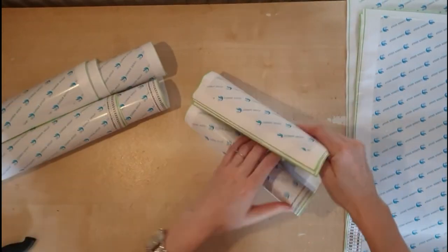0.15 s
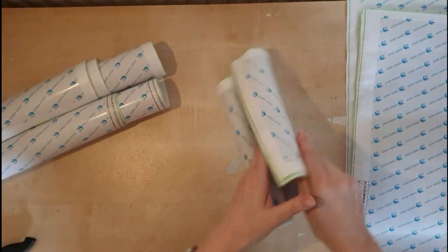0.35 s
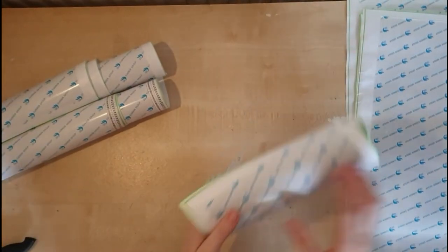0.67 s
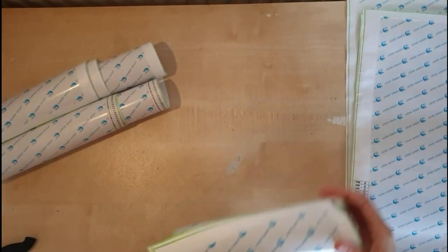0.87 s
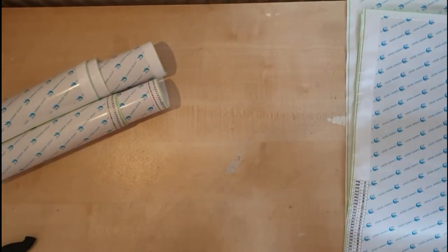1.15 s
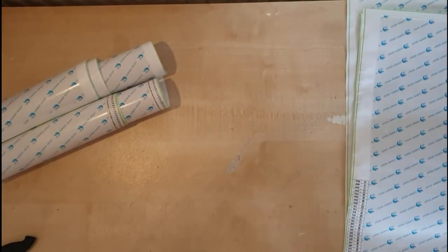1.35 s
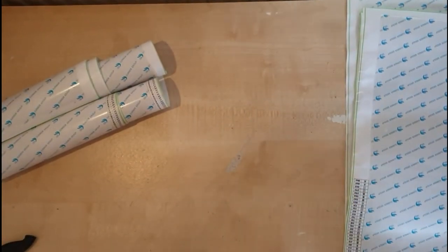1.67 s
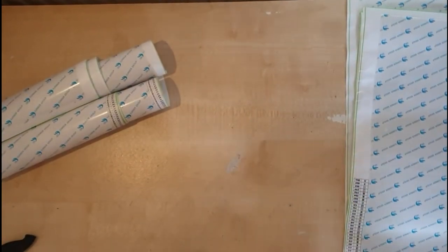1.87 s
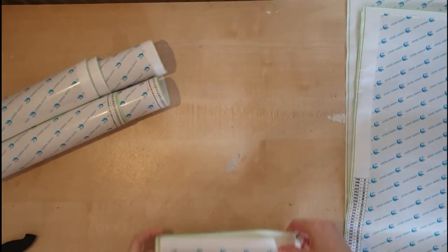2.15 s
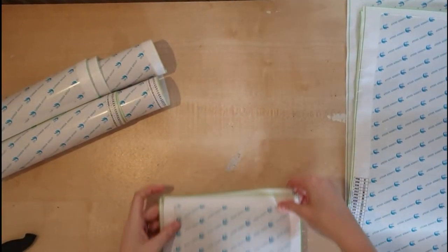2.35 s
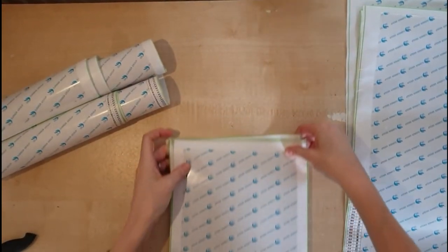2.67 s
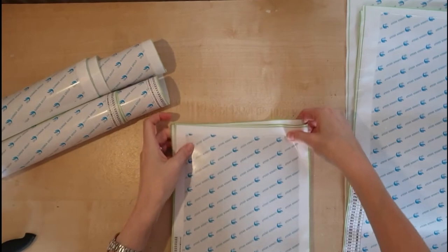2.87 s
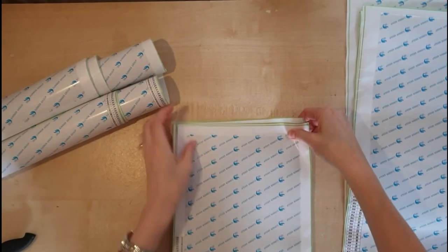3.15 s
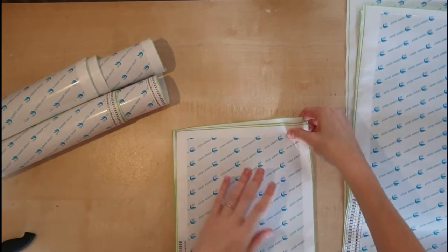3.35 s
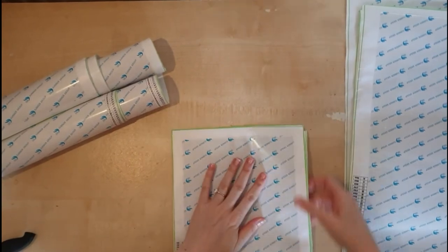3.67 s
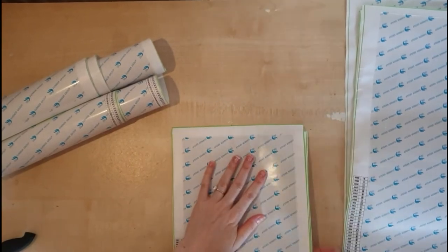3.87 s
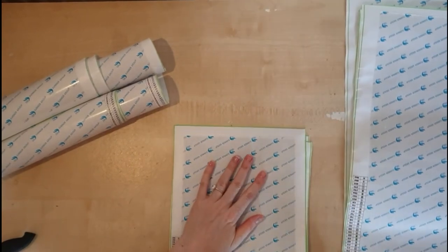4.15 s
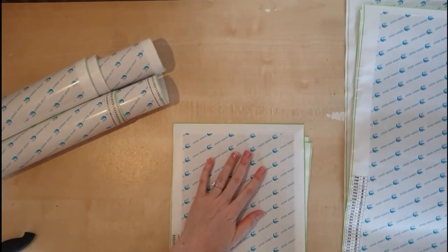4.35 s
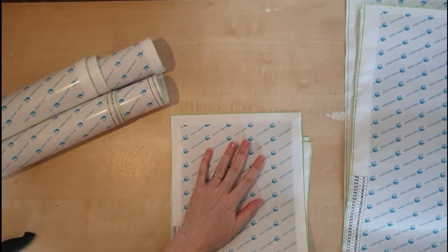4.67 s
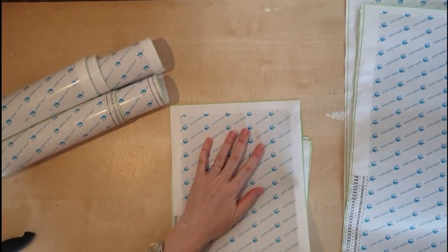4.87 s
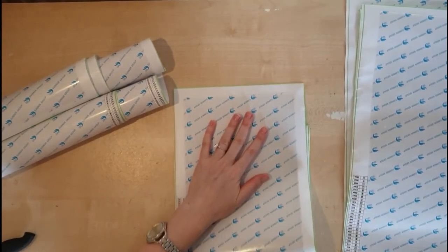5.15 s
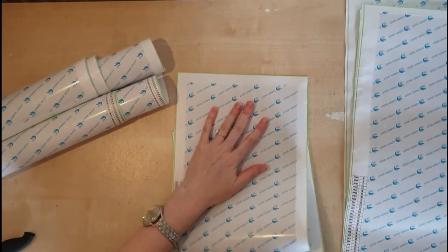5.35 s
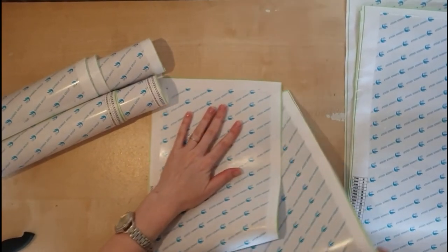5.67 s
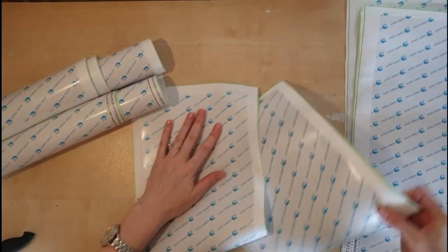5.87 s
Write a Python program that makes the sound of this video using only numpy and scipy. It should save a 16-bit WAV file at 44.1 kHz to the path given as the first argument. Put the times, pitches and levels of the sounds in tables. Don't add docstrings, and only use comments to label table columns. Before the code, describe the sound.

A quiet small room, heard closely in stereo, with faint low traffic rumble and a thin fan whine. From 0 to 1 s, stiff film-covered canvas rustles and rasps in short strokes, with a pop at 0.3 and a cluster of bright ticks near 0.4. Softer hiss and faint brushing continue to 1.8, rising again around 2. At 2.2 the sheets meet the wooden table and drag with hollow, resonant scraping; stuttering groans and pops run to 2.6, then a skid drops in pitch and stops near 2.9. Gentle smoothing, light taps and small pops follow from 3.1 to 4.1. At 4.21 a hard, dry snap strikes, with tiny bounces and a short woody ring. A brief chirp comes at 4.65 and a small double crack at 4.82. From about 5.3 the rustling swells, loudest at 5.55 with creases ticking, and sliding continues to 6 s.

```python
import sys
import numpy as np
from scipy import signal
from scipy.fft import rfft, irfft, next_fast_len
from scipy.io import wavfile

SR = 44100
rng = np.random.default_rng(int(sys.argv[2]) if len(sys.argv) > 2 else 0)


def wav_record(signal):
    frames = np.transpose(np.atleast_2d(signal))
    bounded = np.clip(frames, -1, 1)
    quanta = np.round(bounded * 32767).astype(np.int16)
    wavfile.write(sys.argv[1], SR, quanta)


def boost(x):
    u = np.asarray(x, float) / 20
    return 10 ** u


N = 265041
SIZE = next_fast_len(N + SR // 2)
FREQ = np.maximum(np.arange(SIZE // 2 + 1) * SR / SIZE, 1)


def rms_one(x):
    return x / np.sqrt(np.mean(x ** 2) + 1e-20)


def in_time(rows):
    s, *columns = np.transpose(rows)
    return [np.interp(np.arange(N) / SR, s, column) for column in columns]


def at_hz(points, hz):
    point_hz, values = np.array(points)[:, 0], np.array(points)[:, 1]
    return np.interp(np.log(hz), np.log(point_hz), values)


def drift(rate):
    r = np.exp(-80 * np.pi * rate / SR)
    noise = rng.standard_normal(N // 40 + 2002)
    slow = signal.lfilter([1], [1, -2 * r, r * r], noise)[2000:]
    return np.interp(np.arange(N) / 40, np.arange(len(slow)), rms_one(slow))


def ring(clicks, hz, t60):
    r, w = boost(-60 / (t60 * SR)), 2 * np.pi * hz / SR
    return signal.lfilter([0, np.sin(w)], [1, -2 * r * np.cos(w), r * r], clicks + 1e-18)


def friction(per_s, spread_db, grain_share):
    born = rng.random((2, N)) < per_s * boost(3.0 * drift(15)) / SR
    sizes_db = spread_db * np.minimum(rng.exponential(1, (2, N)), 5)
    catches = born * boost(sizes_db) * rng.choice([-1, 1], (2, N))
    share = np.clip(grain_share, 0, 1)
    return np.sqrt(share) * rms_one(catches) + np.sqrt(1 - share) * rng.standard_normal((2, N))


# (pitch [Hz], likeness [0 to 1])
LIKENESS = [(60, 0.95), (150, 0.89), (380, 0.95), (600, .8), (950, 0.6), (2380, 0.39), (5980, 0.18),
            (15000, 0.12)]
# (pitch [Hz], left minus right [dB])
SIDES = [(60, 0), (180, 1), (550, 0.5), (1650, 2.5), (4970, 1), (15000, -1.5)]


def to_ears(mid, side, alike):
    return np.sqrt(1 + alike) * mid + np.sqrt(1 - alike) * side * [[1], [-1]]


def coloured(pair, shape, patchy_db, count, lead_s=0):
    mid, side = rfft(pair, SIZE) * shape
    alike = np.clip(at_hz(LIKENESS, FREQ), 0, 1)
    lean = boost(at_hz(SIDES, FREQ) / 2)
    right_delay = np.exp(-2j * np.pi * FREQ * lead_s)
    ears = to_ears(mid, side, alike) * [lean, right_delay / lean]
    share = np.cumsum(shape ** 2 / FREQ)
    place = share / share[-1] * (count - 1)
    total = 0
    for k in range(count):
        band = irfft(ears * np.clip(1 - abs(place - k), 0, 1), SIZE)[:, :N]
        total = total + band * boost(patchy_db * (drift(20.3) + drift(3.3)))
    return rms_one(total)


def flanks_db(t, peak, rise, fall):
    before, after = (peak - t) / np.maximum(rise, 1e-3), (t - peak) / np.maximum(fall, 1e-3)
    far = np.where(t < peak, before, after)
    return -10 * (far ** 1.57 + 0.02 * far ** 4)


COARSE_SWING = 1.176


def gestures(rows):
    t = np.arange(0, N + 32, 32) / SR
    peak, rise, fall, db, coarse_db = np.transpose(rows)[:, :, None]
    flanks = flanks_db(t, peak, rise, fall)
    fine = boost(2 * (db + flanks))
    coarse = boost(2 * (db + coarse_db + COARSE_SWING * flanks))
    levels = [10 * np.log10(power.sum(axis=0) + 1e-12) for power in (fine, coarse)]
    return [np.interp(np.arange(N) / SR, t, level) for level in levels]


# (time [s], level [dB])
RUMBLE = [(0, -56.5), (.84, -62), (2.2, -54.5), (3.5, -56), (4.5, -60), (5.1, -59), (5.25, -47),
          (5.38, -57.5), (6.01, -59)]
# (pitch [Hz], level [dB per Hz])
HUM = [(13, -34.5), (22, -32), (43, 9), (65, -7), (97, 0.5), (110, -15.5), (118, -16), (144, -12.5),
       (163, -48), (300, -27), (390, -62), (660, -120)]
# (pitch [Hz], level [dB per Hz])
AIR = [(150, -3), (300, -12), (500, -12), (1100, -19), (1500, -17), (1800, -8.5), (1950, -4.5),
       (2120, -5.5), (2600, -24.5), (4000, -36), (6900, -35), (8800, -39), (15500, -40)]
AIR_DB = -71


def background():
    rumble = coloured(rng.standard_normal((2, N)), boost(at_hz(HUM, FREQ)), patchy_db=0.3, count=3)
    air_shape = boost(at_hz(AIR, FREQ)) / (1 + (120 / FREQ) ** 4)
    air = coloured(rng.standard_normal((2, N)), air_shape, patchy_db=0.5, count=1)
    return boost(in_time(RUMBLE)[0]) * rumble + boost(AIR_DB) * air


# (time [s], board level [dB], weave level [dB])
JOLTS = [
    (4.215, -32, -36),
    (4.818, -45.5, -43),
]
JOLT_RISE_S, JOLT_FILM_DB = 0.0017, -25.5
SHEET_FALL_S = 0.0071
# (peak time [s], rise [s], fall
# [s], film hiss level [dB], weave above film [dB])
SHEET_RUBS = [(0, .02, .04, -57, 2), (.088, 0.081, 0.049, -59.5, 9), (.18, 0.046, 0.19, -58.5, 2.5),
              (.308, 0.037, 0.2, -54, 4), (.415, 0.017, 0.05, -54, 13.5), (.58, .12, 0.063, -61, 1.5),
              (.66, 0.03, 0.02, -64, -10), (.748, 0.017, 0.018, -52, -12), (.82, 0.17, 0.07, -63, -11),
              (.903, 0.0057, 0.043, -57.5, -7), (.95, 0.022, 0.093, -52.5, -2), (1.17, .1, 0.13, -72, -20),
              (1.255, 0.01, 0.17, -61, -19), (1.45, .03, .025, -64, 4), (1.39, 0.059, 0.05, -55.5, 0.5),
              (1.585, .008, 0.088, -72.5, 2), (1.68, 0.046, 0.087, -63, -2), (1.79, 0.13, 0.14, -53, -0.5),
              (2.08, 0.15, 0.1, -53.5, -6.5),
              (2.18, 0.018, 0.71, -59, 7), (2.557, 0.23, 0.21, -54.5, 7.5), (2.72, 0.064, 0.087, -55, 14),
               (2.823, 0.042, .13, -58, 13), (3.04, .08, .06, -71.5, 0), (3.135, 0.019, 0.078, -54, -7),
               (3.219, 0.097, 0.072, -67, 11.5), (3.431, 0.0091, .1, -60, 0.5),
               (3.52, 0.066, 0.082, -60.5, 7), (3.62, 0.076, 0.51, -56.5, -2.5),
               (3.98, 0.047, 0.041, -65, 14), (4.1, 0.12, 0.3, -63.5, 8.5),
               (4.225, 0.0045, 0.067, -72.5, 24), (4.38, 0.11, 0.075, -64, 4.5), (4.6, 0.082, 0.85, -69, 7),
               (4.663, 0.018, 0.06, -59, 12.5), (4.815, .03, .06, -63.5, 9.5), (5.2, 0.58, 1, -60.5, 7),
               (5.55, 0.19, 0.088, -45.5, 0.5), (5.62, 0.066, 0.35, -49.5, 8.5),
               (5.85, 0.13, 0.092, -49, -3), (6.01, 0.052, 0.046, -52.5, 8)]
# (pitch [Hz], level [dB per Hz])
FILM = [(1470, -47), (2500, -8), (3100, -7), (3370, -3), (3780, -2.5), (4830, 4.5), (6930, 6), (8920, 1.5),
        (12000, 5.5), (15600, 3.5)]
# (pitch [Hz], level [dB per Hz])
WEAVE = [(700, -11.5), (1200, -5), (1900, 1.5), (2600, -1), (3200, -1.5), (4200, -2.5), (6000, -7),
         (9000, -14.5)]
FILM_LEAD_S = 4.5e-5


def sheets():
    jolts = [(s, JOLT_RISE_S, SHEET_FALL_S, db + JOLT_FILM_DB, -JOLT_FILM_DB) for s, _, db in JOLTS]
    film_db, weave_db = gestures(SHEET_RUBS + jolts)
    mode_hz = np.exp(rng.uniform(np.log(1200), np.log(8000), 40))
    modes = sum(1 / (1 + ((FREQ / hz - 1) / 0.009) ** 2) for hz in mode_hz)
    film_shape = boost(at_hz(FILM, FREQ))
    weave_shape = boost(at_hz(WEAVE, FREQ)) * np.sqrt(0.4 + modes)
    film = coloured(friction(9000, 3.7, 0.31), film_shape, patchy_db=1.0, count=4, lead_s=FILM_LEAD_S)
    weave = coloured(friction(3000, 3.5, 0.4), weave_shape, patchy_db=1.3, count=6, lead_s=FILM_LEAD_S)
    return boost(film_db + 4.5) * film + boost(weave_db - 0.18) * weave


# (peak time [s], rise [s], fall [s], board level [dB],
# thud above board [dB])
TABLE_RUBS = [(0, 0.022, .12, -51.5, -4), (.308, .004, 0.055, -58, -4), (.42, 0.08, 0.07, -56, -28),
              (.79, 0.24, 0.049, -64, -5), (.95, .03, 0.16, -72, -7), (1.215, 0.021, 0.072, -74, 12),
              (1.42, 0.092, 0.04, -55.5, -21), (1.72, 0.039, 0.09, -60.5, -29),
              (2.162, .003, .03, -49.5, 0.5), (2.189, 0.019, 0.083, -42, 0), (2.43, .15, 0.1, -39.5, -0.5),
         (2.58, 0.15, 0.17, -40, -2), (2.79, 0.37, 0.08, -36, -11), (2.88, 0.061, 0.1, -47, 5),
         (3.201, 0.081, 0.085, -59.5, -4), (3.435, 0.009, 0.17, -49.5, 3.5),
         (3.57, 0.12, 0.011, -54.5, 12.5), (3.88, 0.22, 0.046, -57.5, -10), (3.968, 0.023, 0.059, -46, 1.5),
         (4.128, 0.2, 0.064, -51, -6), (4.668, 0.019, 0.03, -44, -28), (4.72, 0.13, .1, -59.5, -14),
         (4.9, 0.1, 0.07, -59.5, -4), (5.3, 0.24, 0.32, -53.5, -16), (5.657, 0.17, 0.13, -38.5, -11.5),
         (5.835, 0.15, 0.094, -44.5, -2.5), (6.01, 0.069, .04, -42, -21)]
# (pitch [Hz], width [Hz], level [dB])
BOARD = [(535, 17.4, -1.5), (731, 42, -1), (839, 30, -7.5), (889, 30, -4), (1040, 87, -5.5),
         (1168, 12.4, -6.5), (1504, 67, -10.5)]
# (pitch [Hz], level [dB per Hz])
THUD = [(60, -26), (120, -15.5), (190, 1.5), (260, -10), (330, -1), (430, -4), (600, -52.5)]
BOARD_FALL_S, JOLT_THUD_DB = 0.044, -14


def table():
    jolts = [(s, JOLT_RISE_S, BOARD_FALL_S, db, JOLT_THUD_DB) for s, db, _ in JOLTS]
    board_db, thud_db = gestures(TABLE_RUBS + jolts)
    powers = [boost(2 * db) / (1 + (2 * (FREQ - hz) / width) ** 2) for hz, width, db in BOARD]
    modes = np.sqrt(sum(powers)) ** 0.76
    board_shape = modes / (1 + (520 / FREQ) ** 4) / (1 + (FREQ / 2200) ** 2)
    board = coloured(friction(2000, 3.0, 0.3), board_shape, patchy_db=2.0, count=6)
    thud = coloured(friction(400, 3.2, 0.97), boost(at_hz(THUD, FREQ)), patchy_db=2.8, count=4)
    return boost(board_db - 4.5) * board + boost(thud_db - 8.0) * thud


# (peak time [s], rise [s], fall [s], pitch [Hz], level
# [dB])
HOLLOWS = [(.007, 0.011, 0.13, 480, -56), (.35, 0.05, 0.17, 1055, -59.5), (.41, .02, .07, 2100, -71),
           (.97, 0.047, 0.072, 1070, -61), (.905, 0.0052, 0.1, 727, -62.5),
           (1.22, 0.017, 0.036, 467, -69.5), (1.34, 0.081, 0.11, 730, -70), (2.08, .08, 0.037, 1740, -64),
           (2.04, .05, 0.044, 3700, -67), (2.11, .05, .04, 4300, -64), (2.19, .012, 0.044, 180, -51),
           (2.165, .004, .05, 345, -53), (3.89, .015, .02, 1000, -60), (3.525, .02, .025, 950, -56),
           (2.95, .02, .03, 190, -55), (2.39, .03, .03, 755, -48), (2.59, 0.1, 0.11, 1220, -45),
           (2.6, 0.25, 0.21, 534, -50.5), (2.55, 0.13, 0.33, 716, -45.5), (2.41, 0.018, 0.033, 145, -42),
           (2.845, 0.055, 0.056, 424, -44.5), (2.9, 0.034, 0.034, 353, -51.5), (4.222, .006, .05, 140, -49),
           (2.335, 0.022, .03, 875, -47), (2.9, 0.086, 0.057, 195, -47), (3.5, 0.1, 0.062, 105, -54),
           (3.6, .14, 0.014, 189, -56.5), (3.73, 0.11, 0.46, 1250, -65), (4.24, 0.012, 0.04, 845, -42),
           (4.6, 0.093, 0.08, 1700, -62), (4.7, 0.04, 0.09, 1690, -59), (4.846, 0.035, 0.069, 130, -54),
           (5.246, 0.072, 0.039, 210, -63.5), (5.5, 0.27, 0.29, 837, -56), (5.718, 0.12, 0.015, 434, -51.5),
           (6.002, 0.0055, .1, 538, -39.5)]
# (peak time [s], rise [s], fall [s], pitch [Hz], level [dB])
CRUMPLES = [(0.021, 0.069, 0.088, 4940, -48.5), (.423, 0.03, 0.013, 5800, -51),
            (4.823, 0.0066, 0.021, 5100, -46), (1.14, .08, .09, 7000, -73), (.744, .007, .011, 8100, -51.5),
            (.744, .007, .012, 10900, -55)]
HOLLOW_WIDTH_HZ, CRUMPLE_WIDTH_HZ = 87, 1000


def hollows():
    out = np.zeros((2, N + SR))
    for rows, width_hz in (HOLLOWS, HOLLOW_WIDTH_HZ), (CRUMPLES, CRUMPLE_WIDTH_HZ):
        for peak, rise, fall, hz, db in rows:
            i = round(max(peak - 0.5, 0) * SR)
            t = (i + np.arange(SR)) / SR
            t60 = np.log(1000) / np.pi / (1.5 * width_hz * np.sqrt(hz / 1000))
            mid, side = ring(ring(rng.standard_normal((2, SR)), hz, t60), hz, t60)
            alike = np.clip(at_hz(LIKENESS, hz), 0, 1)
            ears = rms_one(to_ears(mid, side, alike))
            lean_db = at_hz(SIDES, hz) / 2 * np.array([[1], [-1]])
            out[:, i:i + SR] += ears * boost(db + flanks_db(t, peak, rise, fall) + lean_db)
    return out[:, :N]


# (time [s], peak level [dB], pitch [Hz], pan to left [dB])
POPS = [(0.306, -38, 1050, 4), (0.897, -58, 726, 0.5), (0.939, -47, 1060, -5), (1.203, -57.5, 433, 2.0),
        (2.158, -45.5, 553, 0.5), (2.177, -39.5, 736, 0.5), (3.19, -44, 1060, 1.5), (3.429, -49, 720, 4),
        (3.57, -44.5, 468, -1), (3.956, -57, 810, -2), (4.119, -42, 780, -0.5), (2.293, -35, 708, 5),
        (2.381, -33, 748, 2.5), (2.434, -32, 720, 2.5), (2.501, -33, 724, 3)]
# (time [s], peak level [dB], pitch [Hz], pan to left [dB])
TICKS = [(0.397, -46, 3000, 3.0), (0.4043, -34, 3600, 4), (0.4095, -35, 3700, 4), (0.412, -35, 2150, 2),
         (.4176, -46, 3300, 3), (.4235, -41, 2500, 1), (0.4255, -29, 3770, 3), (.4262, -32.5, 2100, 5),
         (.455, -42, 3000, 3), (2.823, -30.5, 1820, 6), (4.821, -38.5, 3640, -1), (4.8255, -39, 4000, 1),
         (4.8285, -42, 2400, 0), (5.532, -35, 1610, 4), (5.578, -39, 3330, 2), (5.606, -32, 1940, 1.0),
         (5.6149, -30, 2510, 0)]
# (time [s], peak level [dB], pitch [Hz], pan to left [dB])
CRACKS = [
    (4.8181, -30, 950, 1.0),
    (4.8234, -31, 1000, 1.0),
]


def pops():
    out, span = np.zeros((2, N)), 2000
    click, fade = np.eye(1, span)[0], np.arange(span) / SR
    for rows, cycles, crackle_db in (POPS, 24.0, -15.0), (TICKS, 18.0, -5.0), (CRACKS, 6.5, -12.0):
        for s, db, hz, pan_db in rows:
            crackle = signal.lfilter([1, 0, -0.6], [1, -0.35], rng.standard_normal(span))
            crackle = crackle * boost(crackle_db - 60 * fade / 0.0054)
            overtone = 0.15 * ring(click, 1.94 * hz, 7.3 / hz)
            pop = boost(db) * (ring(click, hz, cycles / hz) + overtone + crackle)
            no_bass = signal.butter(2, hz / 2, "high", fs=SR, output="sos")
            pop = signal.sosfilt(no_bass, pop)
            i = round(s * SR)
            out[:, i:i + span] -= pop * boost([[pan_db / 2], [-pan_db / 2]])
    return out


ROOM_T60_S, ROOM_DB, WALL_CUT_HZ = 0.4, -15, 1700


def room(x):
    lags = rng.uniform(0.013, 0.04, (2, 8))
    t60 = ROOM_T60_S / np.sqrt(1 + (FREQ / WALL_CUT_HZ) ** 2)
    out = []
    for ear in lags:
        loops = [boost(-60 * lag / t60) * np.exp(-2j * np.pi * FREQ * lag) for lag in ear]
        out.append(sum((-1) ** k * g / (1 - g) for k, g in enumerate(loops)))
    return irfft(rfft(x, SIZE) * out, SIZE)[:, :N]


def slips(rows, second_db, third_db, wobble):
    hz, level_db = in_time(rows)
    t = np.arange(N) / SR
    fade_in = np.clip((t - rows[0][0]) / 0.0068, 0, 1)
    fade_out = np.clip((rows[-1][0] - t) / 0.0044, 0, 1)
    phase = 2 * np.pi * np.cumsum(hz * (1 + wobble * drift(36.6))) / SR
    second = boost(second_db + 0.91 * drift(40)) * np.cos(2 * phase)
    third = boost(third_db + 2.2 * drift(28.7)) * np.sin(3 * phase)
    wave = np.sin(phase) + second + third
    return np.sqrt(2) * fade_in * fade_out * boost(level_db + 1.2 * drift(30)) * wave


# (time [s], slip rate [Hz], level [dB])
GROANS = [
    [(2.2, 323, -51), (2.232, 306, -40), (2.268, 332, -39), (2.296, 350, -41), (2.32, 304, -46),
     (2.334, 300, -40), (2.346, 306, -48), (2.36, 307, -38), (2.392, 380, -56)],
    [(2.43, 290, -55), (2.455, 325, -40), (2.475, 360, -49), (2.49, 300, -47), (2.51, 290, -56),
     (2.53, 285, -48), (2.562, 307, -47), (2.59, 310, -62)],
]
# (time [s], slip rate [Hz], level [dB])
SKID = [(2.66, 240, -56), (2.72, 228.3, -52), (2.74, 217, -42), (2.796, 174, -36), (2.808, 164, -41.5),
        (2.822, 150, -35), (2.84, 138, -38.5), (2.87, 114.2, -51), (2.95, 75, -54)]
# (start [s], end [s], slip rate [Hz], level [dB], overtone [dB])
CHIRPS = [
    (2.448, 2.472, 696.5, -33.5, -24),
    (4.647, 4.677, 860, -41, -8),
]


def groans():
    out = sum(slips(rows, -12, -23, 0.0251) for rows in GROANS) + slips(SKID, -9, -14, 0.037)
    for start, end, hz, db, overtone_db in CHIRPS:
        swell = [(start, hz, db - 9), (end - 0.012, hz, db), (end, hz, db)]
        out += slips(swell, overtone_db, -22, 0.0298)
    return out


# (time [s], peak level [dB])
SNAPS = [(4.211, -15.5), (4.217, -24), (4.2217, -32), (4.2337, -34), (4.2395, -32)]
# (pitch [Hz], level [dB], time to fade 60 dB [s])
SNAP_MODES = [(720, -40, 0.054), (795, -23, 0.097), (904, 1.5, 0.048), (974, -12, 0.057),
              (1320, -13, 0.043), (1756, -4.5, 0.042), (1890, 5.5, 0.026), (2310, -2.5, 0.015),
              (2680, -8, 0.013), (3010, 2, 0.0085), (4730, -9, 0.0058)]


def snap():
    clicks = np.zeros(N)
    for s, db in SNAPS:
        clicks[round(s * SR)] = boost(db)
    soft = np.exp(-2 * np.pi * 1500 / SR)
    clicks = signal.lfilter([(1 - soft) ** 2], [1, -2 * soft, soft ** 2], clicks + 1e-18)
    rings = sum(boost(db) * ring(clicks, hz, t60) for hz, db, t60 in SNAP_MODES)
    no_bass = signal.butter(2, 700, "high", fs=SR, output="sos")
    return -signal.sosfilt(no_bass, rings) * boost([[1.5], [-1.5]])


def scene():
    sharp = snap() + pops() + groans() * boost([[0.4], [-0.4]])
    echo = boost(ROOM_DB) * room(sharp.mean(axis=0))
    return background() + sheets() + table() + hollows() + sharp + echo


def low_pass(x):
    return signal.sosfilt(signal.butter(12, 15750, fs=SR, output="sos"), x)


def record(dry):
    band = signal.butter(4, [36, 15900], "band", fs=SR, output="sos")
    top = signal.cheby2(12, 60, 16100, fs=SR, output="sos")
    mix = signal.sosfilt(np.vstack([band, top]), dry)
    return low_pass(mix)


dry = scene()
out = record(dry)
wav_record(out)
```